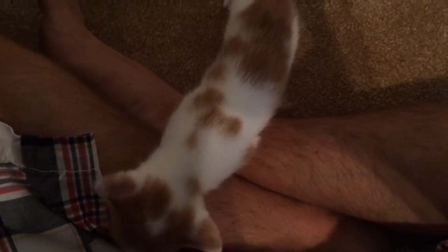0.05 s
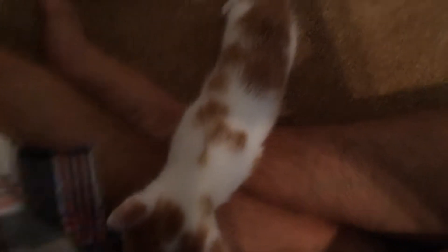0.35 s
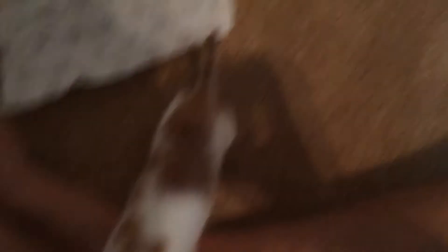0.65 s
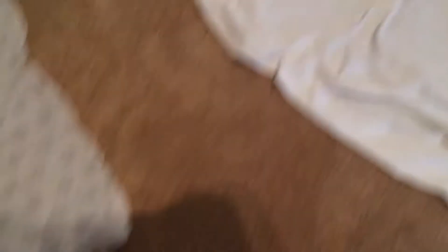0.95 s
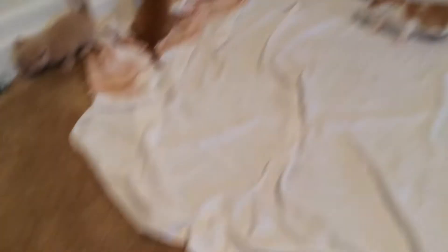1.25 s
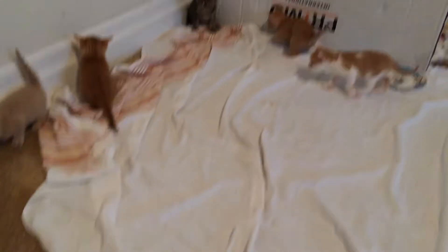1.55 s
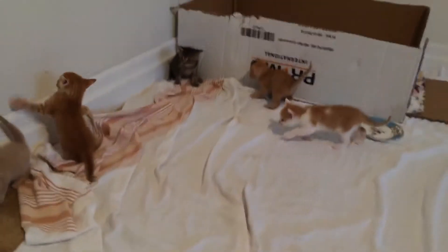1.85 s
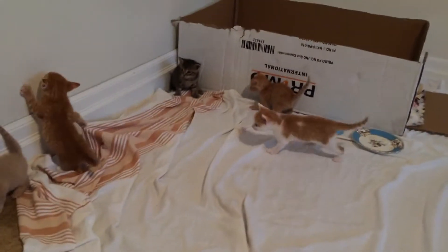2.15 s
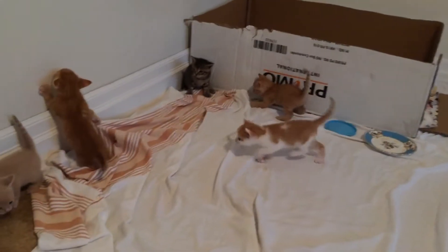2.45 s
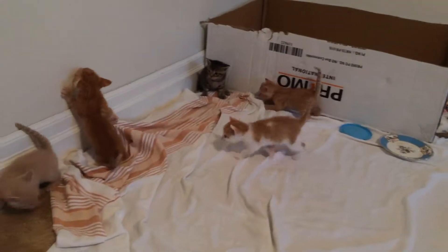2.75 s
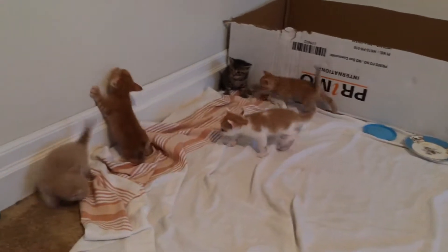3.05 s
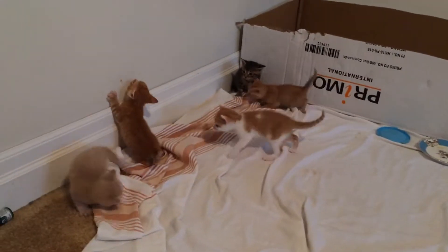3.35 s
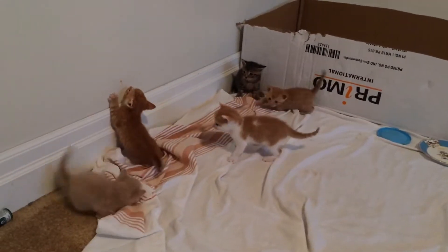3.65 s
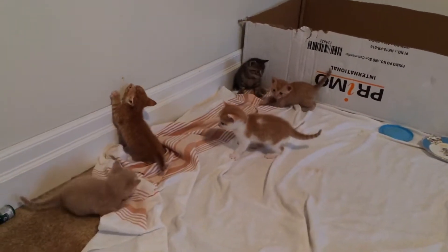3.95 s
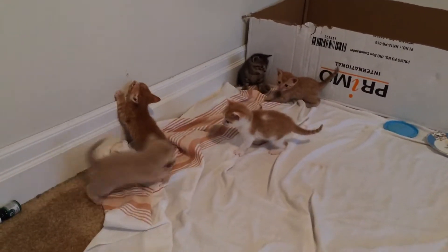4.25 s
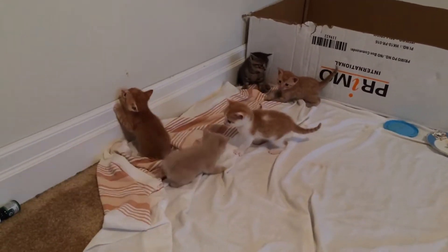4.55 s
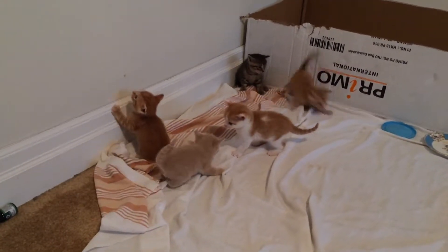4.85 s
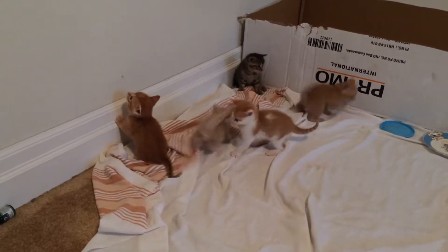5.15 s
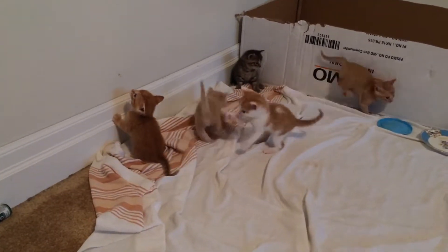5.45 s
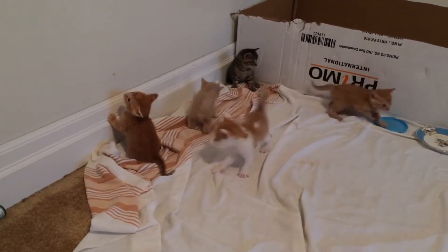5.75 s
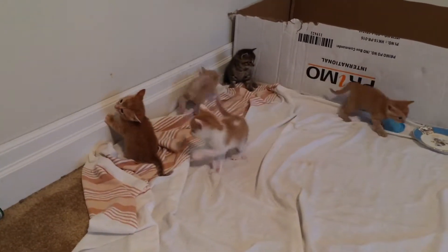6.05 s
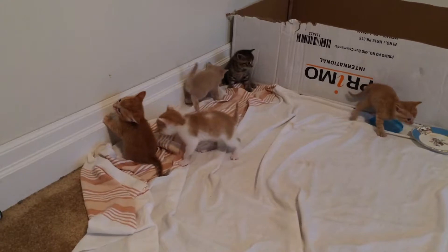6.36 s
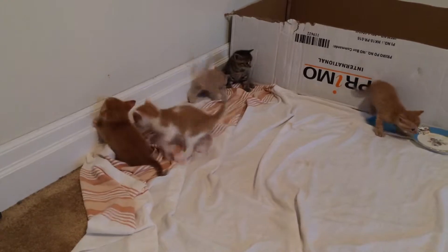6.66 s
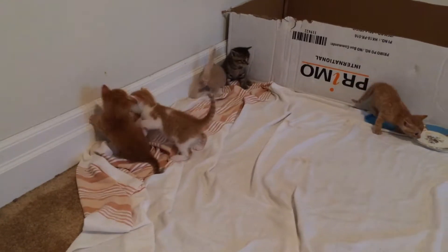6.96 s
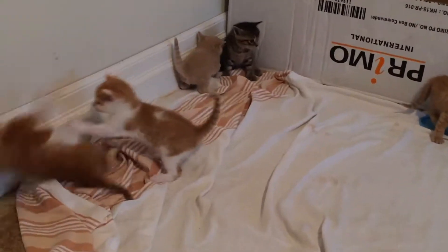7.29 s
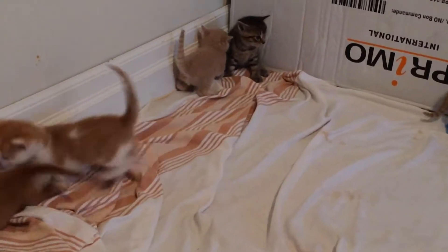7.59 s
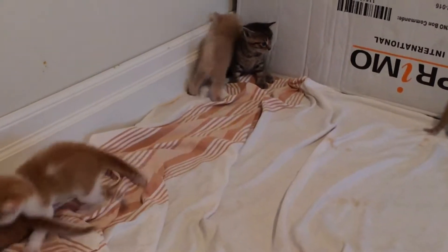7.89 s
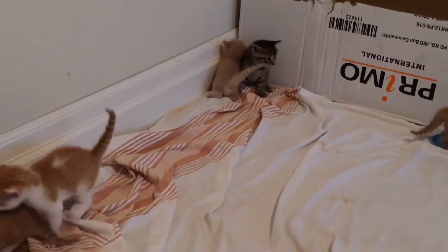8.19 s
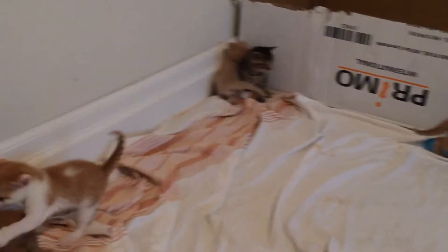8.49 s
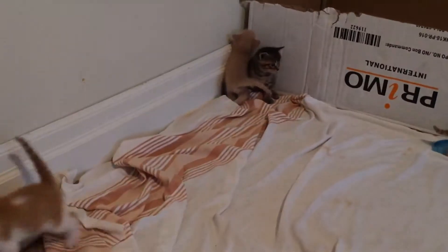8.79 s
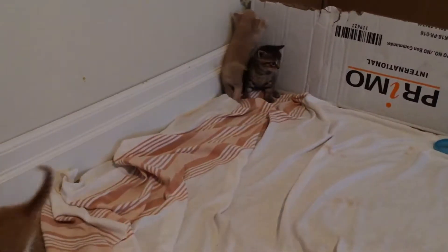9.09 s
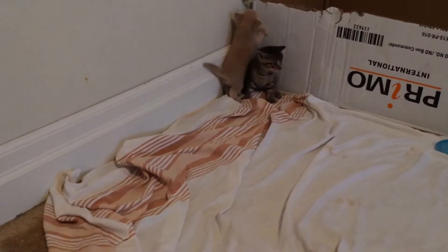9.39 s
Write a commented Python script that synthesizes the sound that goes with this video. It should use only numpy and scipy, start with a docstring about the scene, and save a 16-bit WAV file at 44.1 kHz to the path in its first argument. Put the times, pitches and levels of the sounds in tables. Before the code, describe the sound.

Small kittens scramble on cloth indoors, with soft pattering paws, scratching, rustling fabric and a few thumps over a faint hum.

```python
"""A small room, where kittens scramble over a sheet on carpet between a wall and a cardboard box.
Paws and bodies thud softly and excite the damped modes of floor and box. Friction makes the cloth
scuff, slide and rub; claws pluck the weave and tick as they snap free. A short reverberation follows
the play. Underneath lie the rumble of a hand-held microphone, a faint mains hum and a rush of air."""
import sys
import numpy as np
from scipy import signal
from scipy.fft import rfft, irfft, next_fast_len
from scipy.io import wavfile

SR = 44100
rng = np.random.default_rng(int(sys.argv[2]) if len(sys.argv) > 2 else 0)


def transcribe(signal):
    """Save signal, clipped to [-1, 1], as a 16-bit WAV file at the path in sys.argv[1]."""
    frames = np.atleast_2d(signal).T
    limited = np.clip(frames, -1, 1)
    pcm = np.round(limited * 32767).astype(np.int16)
    wavfile.write(sys.argv[1], SR, pcm)


N = 420273
TIME = np.arange(N) / SR

# midrange spectrum of cloth friction, the body of scuffs and slides: frequency_hz, level_db
CLOTH_BODY = [(300, -12), (550, -7), (820, -1), (1350, 0), (1850, -1), (2400, -7), (3500, -22), (9000, -32)]


def from_db(db):
    """Amplitude grows tenfold for every 20 dB."""
    return 10 ** (np.asarray(db) / 20)


def unit_rms(x):
    """Normalisation to a mean power of 1."""
    return x / np.sqrt(np.mean(x ** 2) + 1e-20)


def add(out, start_s, sound):
    """Superposition: a sound adds to what is already there."""
    at = int(np.clip(round(start_s * SR), 0, N - 1))
    out[at:at + len(sound)] += sound[:N - at]


def coloured(noise, spectrum):
    """Spectral shaping: noise is filtered by a (frequency_hz, level_db) curve and scaled to rms 1."""
    size = next_fast_len(N)
    hz, db = np.transpose(spectrum)
    bin_hz = np.arange(size // 2 + 1) * SR / size
    gain = from_db(np.interp(np.log(bin_hz + 1), np.log(hz), db))
    return unit_rms(irfft(rfft(noise, size) * gain, size)[:N])


def drift(rate_hz):
    """Random modulation: straight lines between chance values, with rms 1."""
    knots = rng.standard_normal(int(N / SR * rate_hz) + 2)
    return unit_rms(np.interp(TIME * rate_hz, np.arange(len(knots)), knots))


def swell(peak_s, rise_s, fall_s):
    """Envelope of a movement that speeds up and slows: 1 at the peak, -20 dB one rise or fall away."""
    away = np.maximum((peak_s - TIME) / rise_s, (TIME - peak_s) / fall_s)
    return from_db(-20 * np.minimum(away, 4) ** 1.6)


def ring(x, hz, t60_s):
    """Damped oscillator: a unit impulse starts a decaying sine of height 1."""
    radius, angle = from_db(-60 / (t60_s * SR)), 2 * np.pi * hz / SR
    return signal.lfilter([0, np.sin(angle)], [1, -2 * radius * np.cos(angle), radius ** 2], x + 1e-18)


def resonate(x, hz, width_hz):
    """Resonance: a band passes, with gain 1 at its centre."""
    return signal.lfilter(*signal.iirpeak(hz, hz / width_hz, fs=SR), x)


def fibre_friction(slips_per_s, hiss_gain, clump_db):
    """Stick-slip friction: tiny random impulses over a smooth hiss, both fluctuating in level."""
    slips = unit_rms((rng.random(N) < slips_per_s / SR) * rng.standard_normal(N))
    return (slips + hiss_gain * rng.standard_normal(N)) * from_db(clump_db * drift(220))


def footfalls(onset_delay_s=.0022, settle_s=.018, settle_db=-17, steps_per_s=1.5):
    """Impacts: each bump thuds just after its listed time, then settles more softly; faint steps join."""
    # bumps of paws and bodies (the result has the same columns): start_s, level_db, pitch_hz, pat_db
    bumps = [(0.293, -36, 283, -45), (0.445, -43, 194, -53), (0.728, -36, 105, -60),
             (0.779, -26, 91.5, -56), (0.814, -30, 118, -52), (0.855, -35, 80.7, -48),
             (1.253, -41, 148, -58), (1.576, -45, 199, -66), (1.642, -44, 110, -65), (1.986, -26, 164, -57),
             (2.005, -35, 116, -59), (2.146, -47, 167, -61), (2.376, -39, 143, -57), (2.396, -46, 167, -59),
             (3.089, -44, 180, -64), (3.136, -40, 425, -47), (3.243, -39, 188, -56), (3.443, -39, 124, -63),
             (3.465, -31, 116, -65), (3.507, -40, 129, -65), (3.782, -34, 167, -58), (4.063, -36, 221, -50),
             (4.417, -42, 221, -56), (4.86, -34, 132, -68), (4.88, -36, 116, -66), (4.95, -46, 218, -57),
             (5.156, -46, 183, -61), (5.183, -33, 202, -44), (5.34, -12, 121, -29), (5.444, -15, 159, -33),
             (5.459, -16, 127, -32), (5.65, -43, 172, -57), (5.694, -45, 264, -53), (6.596, -44, 99.6, -64),
             (7.284, -31, 132, -60), (7.463, -30, 175, -49), (7.504, -28, 250, -34), (7.745, -42, 145, -61),
             (8.007, -36, 196, -52), (8.033, -22, 172, -46), (8.052, -27, 178, -47),
             (8.084, -32, 96.9, -62), (8.416, -42, 167, -64), (8.537, -45, 132, -60),
             (8.858, -39, 121, -56), (9.142, -35, 213, -55), (9.155, -33, 175, -58)]
    landings = [(s + onset_delay_s, db, hz, pat_db) for s, db, hz, pat_db in bumps]
    settling = [(s + settle_s, db + settle_db, hz * .85, pat_db + settle_db)
                for s, db, hz, pat_db in landings]
    chances = rng.random((int(steps_per_s * N / SR), 2))
    steps = [(when * N / SR, -53, 160 * 2 ** (pitch - .5), -68) for when, pitch in chances]
    return landings + settling + steps


def thumps(falls, strike_db, mode_db):
    """Impact excitation: a force pulse of a few cycles sets floor and box ringing."""
    # modes of floor and box: frequency_hz, level_db, t60_s
    floor_modes = [(48, -17, .3), (110, -21, .13), (172, -19, .09), (318, -22, .1), (410, -22, .05),
                   (610, -25, .06), (745, -25, .06), (1020, -27, .05)]
    force, t = np.zeros(N), TIME[:SR // 6]
    for start_s, db, hz, _ in falls:
        cycles = t * hz
        envelope = (cycles * np.exp(1 - cycles)) ** 2
        add(force, start_s, from_db(db + strike_db) * envelope * np.sin(2 * np.pi * hz * t))
    # modes follow the change of force, so short hard bumps reach the higher ones
    jolt = np.diff(force, prepend=0)
    return force + from_db(mode_db) * sum(from_db(db) * ring(jolt, hz, t60) for hz, db, t60 in floor_modes)


def pats(falls, level_db, rise_s, limit_db):
    """Compression: the cloth under each bump gives a dull puff, limited once it is pressed flat."""
    # spectrum of the puff: frequency_hz, level_db
    puff_spectrum = [(150, -6), (270, 0), (380, -3), (500, -17), (900, -23), (1600, -35), (4000, -58)]
    force, age = np.zeros(N), TIME[:SR // 8] / rise_s
    for start_s, _, _, db in falls:
        add(force, start_s, from_db(min(db, limit_db) + level_db) * age * np.exp(1 - age))
    return force * coloured(rng.standard_normal(N), puff_spectrum)


def knocks(contact_s, level_db, panel_db=-3.5, db_per_octave=-22, blow_t60_s=.014):
    """Modal response: a stiff panel struck through fur rings most near the pitch of the blow."""
    # harder blows on box, skirting and floor: start_s, level_db, pitch_hz
    blows = [(.857, -44, 310), (2.379, -48, 1000), (2.968, -52, 1000), (3.14, -48, 1100), (4.066, -45, 990),
             (5.188, -45, 420), (5.343, -31, 780), (5.346, -21, 330), (5.455, -27, 395), (5.456, -44, 1000),
             (5.752, -52, 600), (7.282, -36, 1150), (7.467, -39, 700), (7.507, -29, 540), (7.515, -42, 520),
             (8.045, -43, 1600)]
    # modes of the panel: frequency_hz, level_db, t60_s
    panel_modes = [(318, -1, .07), (390, 0, .055), (520, -5, .035), (740, -4, .022), (850, -5, .04),
                   (990, -1, .06), (1345, -1, .045), (1720, -1, .035)]
    out, t = np.zeros(N), TIME[:SR // 8]
    for start_s, db, blow_hz in blows:
        modes = [(hz, panel_db + mode_db + db_per_octave * abs(np.log2(hz / blow_hz)), t60)
                 for hz, mode_db, t60 in panel_modes]
        for hz, partial_db, t60 in [(blow_hz, 0, blow_t60_s)] + modes:
            envelope = (1 - np.exp(-t / contact_s)) * from_db(-60 * t / t60)
            partial = envelope / envelope.max() * np.sin(2 * np.pi * hz * t)
            add(out, start_s, from_db(db + partial_db + level_db) * partial)
    return out


def scuffs(level_db, release_power):
    """Transient friction: a paw shoves the cloth, and the noise dies ever faster as the paw stops."""
    # shoves of a paw: start_s, rise_s, fall_s (to -20 dB), body_db, hiss_db, edge_db
    shoves = [(.607, .004, .024, -80, -65, -65), (.908, .006, .026, -64, -61, -68),
              (1.181, .002, .04, -56, -56, -61), (1.305, .018, .027, -66, -56, -57),
              (1.336, .013, .03, -62, -59, -60), (1.883, .003, .08, -65, -61, -61),
              (1.979, .003, .09, -55, -45, -55), (2.03, .031, .04, -57, -42, -53),
              (2.151, .003, .05, -68, -54, -61), (2.335, .021, .042, -66, -56, -68),
              (2.374, .007, .05, -50, -59, -67), (2.966, .002, .03, -58, -62, -68),
              (3.138, .003, .019, -53, -61, -69), (4.065, .002, .021, -51, -68, -90),
              (4.393, .013, .045, -65, -62, -66), (4.48, .02, .11, -78, -66, -69),
              (4.856, .03, .055, -72, -65, -59), (5.344, .002, .028, -41, -58, -61),
              (5.364, .003, .024, -59, -46, -54), (5.385, .01, .055, -57, -62, -63),
              (5.435, .018, .13, -62, -63, -60), (6.5, .015, .025, -72, -68, -69),
              (6.591, .005, .1, -74, -60, -65), (7.28, .0015, .056, -45, -47, -56),
              (7.325, .032, .036, -49, -55, -60), (7.465, .003, .022, -53, -52, -59),
              (7.506, .003, .021, -52, -69, -78), (8.005, .009, .032, -54, -55, -56),
              (8.037, .01, .034, -47, -54, -62), (9.134, .003, .04, -66, -66, -65),
              (9.167, .022, .04, -64, -61, -58), (9.21, .045, .125, -60, -60, -59),
              (9.362, .036, .06, -58, -58, -56)]
    # friction spectra of the treble hiss and of the edge above it: frequency_hz, level_db
    hiss_spectrum = [(1500, -20), (2400, -1), (3300, -2), (4700, -1), (6100, 2), (7500, -4), (10000, -22)]
    edge_spectrum = [(5500, -18), (7800, 1), (11000, -2), (15500, -6)]
    # cavity resonances of the box: frequency_hz, width_hz, gain_db
    hollows = [(850, 50, -2), (1345, 45, -1), (1715, 55, -1), (2330, 50, 1), (2790, 40, -2), (4525, 60, -3),
               (5800, 160, -3), (6300, 60, -2)]
    friction, t = np.zeros(N), TIME[:SR // 3]
    grain = fibre_friction(slips_per_s=5000, hiss_gain=.8, clump_db=1.5)
    for band, spectrum in enumerate([CLOTH_BODY, hiss_spectrum, edge_spectrum]):
        power = np.zeros(N)
        for start_s, rise_s, fall_s, *band_db in shoves:
            attack = np.minimum(t / rise_s, 1)
            release = from_db(-20 * (np.maximum(t - rise_s, 0) / fall_s) ** release_power)
            add(power, start_s, (from_db(band_db[band]) * attack * release) ** 2)
        band_grain = np.roll(grain, band * SR)  # the shift decorrelates the bands
        friction += np.sqrt(power) * coloured(band_grain, spectrum)
    box = sum(from_db(db) * resonate(friction, hz, width_hz) for hz, width_hz, db in hollows)
    return from_db(level_db) * (friction + box)


def scratches(width_hz, rasp_db):
    """Repeated plucking: a claw catches thread after thread, a narrow zip within a wider rasp."""
    # drags across the weave: start_s, length_s, level_db, pitch_hz
    drags = [(.67, .035, -69, 2400), (1.03, .035, -69, 2450), (1.335, .04, -63, 2100),
             (2.2, .045, -66, 5600), (2.25, .06, -63, 5600), (2.56, .13, -69, 5200), (2.85, .08, -70, 5000),
             (4.14, .06, -69, 5300), (4.245, .06, -65, 5600), (4.53, .04, -72, 4000),
             (6.44, .035, -66, 4100), (6.62, .14, -64, 4050), (6.68, .06, -71, 5600),
             (6.778, .045, -66, 4200), (7.066, .02, -70, 5200)]
    out, grain = np.zeros(N), fibre_friction(slips_per_s=3000, hiss_gain=.7, clump_db=2.5)
    for start_s, length_s, db, hz in drags:
        size, at = int(length_s * SR) + 2, int(start_s * SR)
        rasp = resonate(grain[at:at + size], hz, width_hz)
        narrow_zip = resonate(rasp, hz, width_hz)
        scratch = unit_rms(unit_rms(narrow_zip) + from_db(rasp_db) * unit_rms(rasp))
        add(out, start_s, from_db(db) * scratch * np.sqrt(np.hanning(size).clip(0)))
    return out


def ticks(decay_s, level_db):
    """Sudden release: a claw tip snaps free with a brief broadband crack."""
    # claw tips catching: start_s, level_db
    catches = [(1.8836, -39), (2.4049, -48), (2.9677, -49), (3.1238, -49), (5.5169, -41), (6.343, -49),
               (6.5969, -44), (7.4824, -44), (8.2372, -52)]
    out, t = np.zeros(N), TIME[:SR // 40]
    for start_s, db in catches:
        burst = rng.standard_normal(len(t)) * np.exp(-t / decay_s)
        crack = resonate(burst, hz=6500, width_hz=8000)
        add(out, start_s, from_db(db + level_db) * crack / np.abs(crack).max())
    return out


def slides():
    """Sliding friction: cloth drawn along gives a smooth noise that grows with its speed."""
    # long strokes of cloth: peak_s, rise_s, fall_s, body_db, hiss_db
    strokes = [(1.9, .22, .3, -65, -70), (2.24, .2, .22, -74, -70), (2.62, .14, .16, -71, -68),
               (2.89, .12, .14, -73, -72), (3.38, .42, .29, -61, -62.5), (9.4, .32, .45, -68, -68)]
    body_gain, hiss_gain = sum(np.outer(from_db(band_db), swell(peak_s, rise_s, fall_s))
                               for peak_s, rise_s, fall_s, *band_db in strokes)
    grain = fibre_friction(slips_per_s=6000, hiss_gain=1.5, clump_db=1.0)
    hiss = coloured(grain, [(1200, -25), (2800, 0), (5500, 0), (8500, -8), (15500, -14)])
    return body_gain * coloured(rng.standard_normal(N), CLOTH_BODY) + hiss_gain * hiss


def rub(note_db, wander, slow_hz=380, pitch_power=2.2):
    """Stick-slip oscillation: a blurred note rises and sinks with the speed, in dull friction noise."""
    # rubbing strokes: peak_s, ramp_s, level_db, top_pitch_hz
    strokes = [(8.65, .09, -65, 380), (8.94, .33, -59, 650)]
    force, hz = 0, slow_hz
    for peak_s, ramp_s, db, top_hz in strokes:
        speed = swell(peak_s, ramp_s, ramp_s)
        force += from_db(db) * speed
        hz += (top_hz - slow_hz) * speed ** pitch_power
    phase = 2 * np.pi * np.cumsum(hz * (1 + wander * drift(400))) / SR
    note = unit_rms(sum(np.sin(k * phase) / k for k in range(1, 5)))
    spectrum = [(150, -12), (400, 0), (1200, -6), (2000, -9), (3300, -11), (5000, -24), (15000, -34)]
    friction = coloured(rng.standard_normal(N), spectrum)
    return force * unit_rms(friction + from_db(note_db) * note)


def reverberation(x, t60_s, cutoff_hz, delay_s):
    """Diffuse reflections decay exponentially; carpet and cloth absorb their treble."""
    t = TIME[:SR // 2]
    tail = rng.standard_normal(len(t)) * (t > delay_s) * from_db(-60 * t / t60_s)
    absorption = signal.butter(1, cutoff_hz, fs=SR, output="sos")
    tail = signal.sosfilt(absorption, tail / np.linalg.norm(tail))
    return signal.fftconvolve(x, tail)[:N]


def handling_rumble():
    """Structure-borne noise: a hand-held microphone rumbles when it is moved or jolted."""
    # movements of the hand: peak_s, level_db, rise_s, fall_s
    movements = [(.2, -65, 1.0, 1.0), (.82, -49, .18, .42), (1.62, -59, .16, .25), (2.05, -62, .2, .3),
                 (3.49, -51, .1, .28), (5.46, -59, .1, .15), (8.07, -49, .1, .13), (9.25, -59, .35, .9)]
    # spectrum of the rumble: frequency_hz, level_db
    rumble_spectrum = [(20, -11), (50, 0), (75, -1), (115, 0), (150, -3), (200, -1), (270, -14), (380, -15),
                       (500, -29), (1000, -50)]
    gain = sum(from_db(db) * swell(peak_s, rise_s, fall_s) for peak_s, db, rise_s, fall_s in movements)
    return gain * coloured(rng.standard_normal(N), rumble_spectrum)


def mains_hum():
    """A line spectrum: steady tones of mains and motor, each wandering slightly in phase."""
    # partials of the hum and motor whine: frequency_hz, rms_db
    partials = [(59.2, -72), (118.4, -70), (296.1, -79), (791.3, -87), (1319, -89), (1583, -84),
                (1976, -90)]
    return sum(from_db(db) * np.sqrt(2) * np.sin(2 * np.pi * hz * TIME + .6 * drift(5))
               for hz, db in partials)


def room_air(level_db):
    """Stationary broadband noise: a rush of air, strongest in the bass."""
    # spectrum of the air: frequency_hz, level_db
    air_spectrum = [(25, -22), (39, -9), (52, -1), (90, -2), (180, -1), (260, -7), (450, -10), (700, -12),
                    (1100, -15.5), (1950, -16), (2550, -22), (4000, -25), (5200, -28.5), (15500, -32.5)]
    return from_db(level_db) * coloured(rng.standard_normal(N), air_spectrum)


def scene():
    """Superposition of the kittens' direct sound, its reverberation and the background."""
    falls = footfalls()
    play = thumps(falls, strike_db=-2.8, mode_db=-4.5)
    play += pats(falls, level_db=-.5, rise_s=.006, limit_db=-39)
    play += knocks(contact_s=.0015, level_db=-2.5)
    play += scratches(width_hz=950, rasp_db=-2) + ticks(decay_s=.0015, level_db=-2.5)
    play += scuffs(level_db=-2.2, release_power=1.35) + slides() + rub(note_db=-.5, wander=.045)
    reflections = from_db(-12.5) * reverberation(play, t60_s=.28, cutoff_hz=6000, delay_s=.005)
    background = room_air(level_db=-62.4) + mains_hum() + handling_rumble()
    return (play + reflections + background)[None]


def record(dry):
    """Band limiting: a steep low-pass filter cuts the treble above 15.9 kHz."""
    return signal.sosfilt(signal.ellip(10, .1, 70, 15900, fs=SR, output="sos"), dry)


dry = scene()
out = record(dry)
transcribe(out)
```